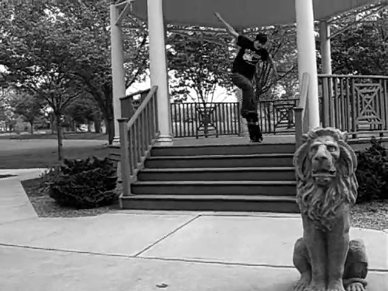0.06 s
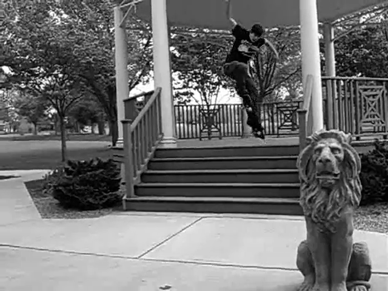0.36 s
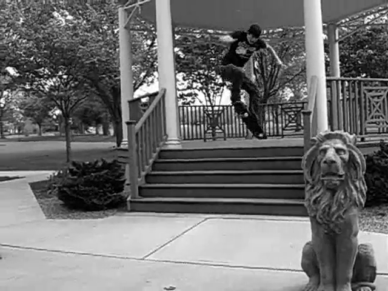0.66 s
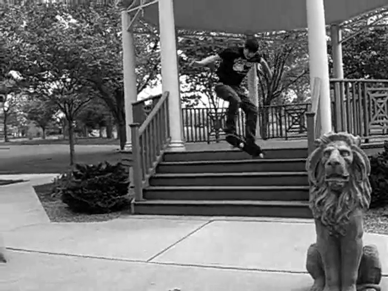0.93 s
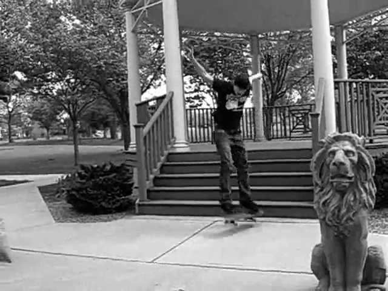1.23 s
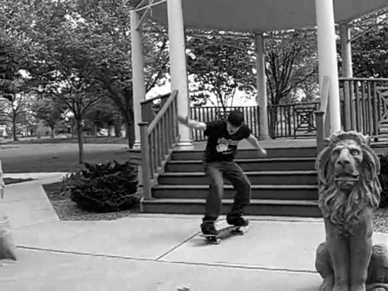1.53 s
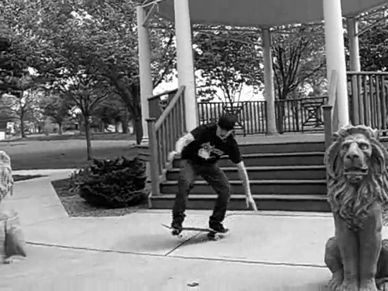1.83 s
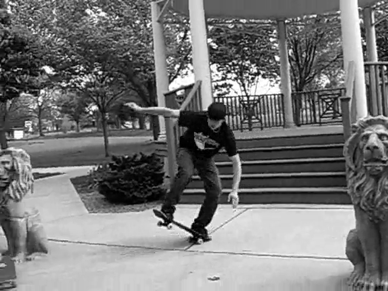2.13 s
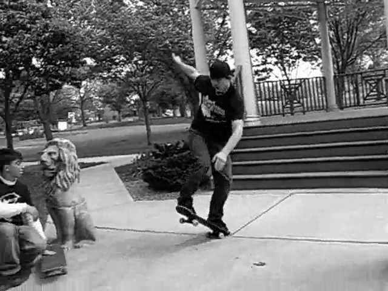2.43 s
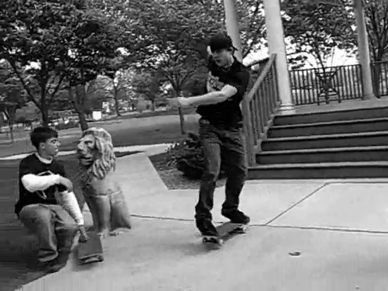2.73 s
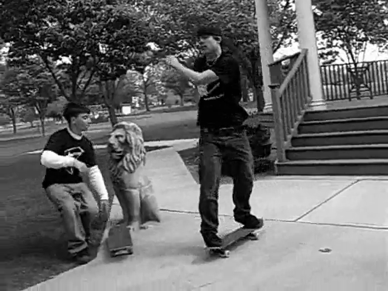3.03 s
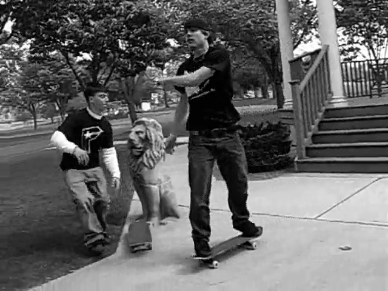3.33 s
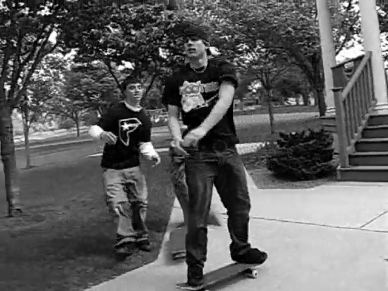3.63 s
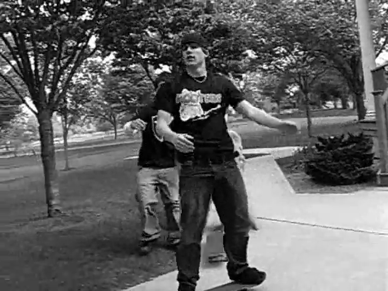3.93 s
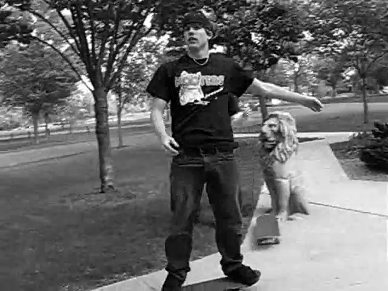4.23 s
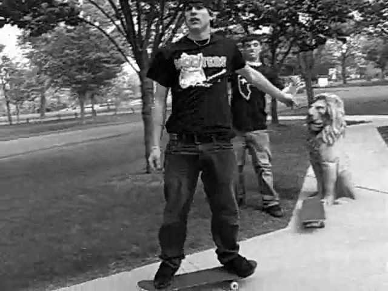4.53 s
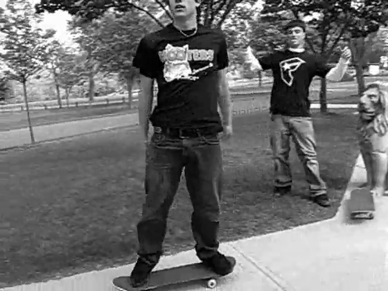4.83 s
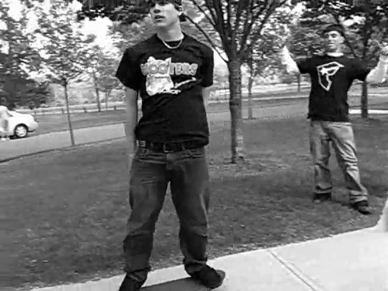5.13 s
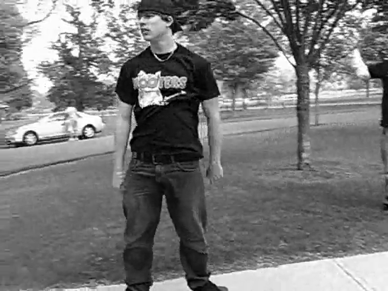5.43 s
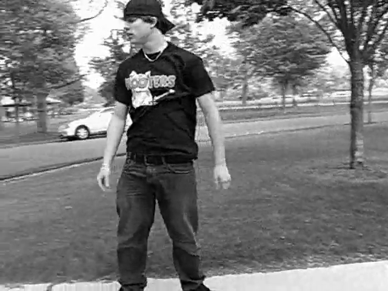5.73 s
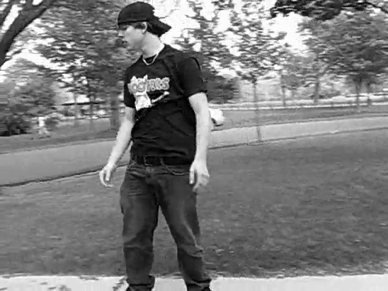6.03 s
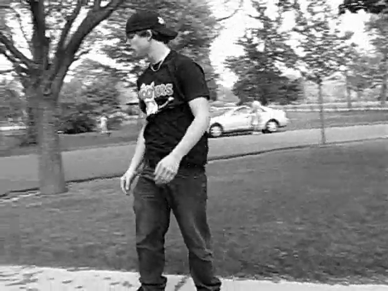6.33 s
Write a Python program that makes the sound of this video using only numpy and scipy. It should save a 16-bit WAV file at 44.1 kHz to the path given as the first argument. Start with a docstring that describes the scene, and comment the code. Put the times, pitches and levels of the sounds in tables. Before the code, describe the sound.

A low thump of wind hits the microphone, and at about 0.2 seconds a skateboard pops off a wooden platform some five metres away. A faint tap follows at 1 second. At 1.4 seconds the board lands on concrete with a loud, rattling crack and a short outdoor echo, then starts rolling. Around 2.2 seconds it clacks and the wheels skid briefly through a turn, with another clack near 2.9 seconds. The rough roll comes closer, knocking over pavement joints from 3.6 seconds, hardest at about 4.3. Between 4.5 and 5.2 seconds it passes about a metre away, crunching grit, with light metal clinks and ticking bearings. It then rolls more quietly, with a few small knocks around 6.3 seconds. Wind rumbles and buffets the microphone over a faint hiss throughout, strongest from about 2.3 to 4 seconds and easing after 5.

```python
"""A thump of wind on the microphone, then a skateboard cracks off a wooden bandstand five metres away.
Deck and trucks ring as it lands on concrete; the wheels skid through a pivot, then roll up to within a
metre, crushing grit and jolting over joints in the pavement. Steps, pillars and trees give a short echo.
Gusts buffet the microphone of a tape camcorder, whose notch filters cut at the harmonics of its motor
and whose gain control ducks after loud moments."""
import sys
import numpy as np
from scipy import signal
from scipy.fft import rfft, irfft
from scipy.io import wavfile

SR = 44100
rng = np.random.default_rng(int(sys.argv[2]) if len(sys.argv) > 2 else 0)


def generate_wav(sig):
    """Save sig (samples, or channels by samples) to the path in sys.argv[1] as 16-bit PCM at SR."""
    pcm = np.round(np.clip(np.atleast_2d(sig).T, -1, 1) * 32767).astype(np.int16)
    wavfile.write(sys.argv[1], SR, pcm)


N = 285537
TIME = np.arange(N) / SR

# The board's line. Each row: time in seconds, distance to the microphone in metres, roughness 0-1.
PATH = [(0, 5.4, .6), (1.4, 3.3, 0.7), (2.1, 6, .6), (3.1, 3.8, 0.7), (3.46, 3.3, 0.77), (3.7, 1.42, 0.86),
        (4.5, 0.83, 0.39), (5.1, 1.66, 0.47), (5.4, 1.1, 0.2), (6.0, 1.35, 0.48), (6.47, 2.1, 0.8)]
TOUCHDOWN_S = 1.45
# Pop, catch, landing, pivot, nose set down. Each row: start in seconds, deck level in dB, snap level
# in dB, rattle time constant in seconds, mode level in dB relative to the deck.
BLOWS = [(0.1625, -12, -24.5, 0.013, 1), (1.006, -24.5, -50, 0.0074, -5), (1.026, -23, -42, 0.023, -5.5),
         (1.25, -35, -44, 0.016, -14), (1.41, -1.5, -8, 0.015, -2), (1.422, -6.5, -13, 0.021, 4),
         (1.449, -12, -35, 0.013, -19), (1.477, -26, -12, 0.0045, -15), (1.488, -24.5, -35, 0.017, 16),
         (2.1756, -10, -13.5, 0.0066, 2.5), (2.238, -13.5, -32, 0.0064, 10.5), (2.8774, -9, -17, 0.015, -6),
         (2.8854, -18, -31, 0.018, 10.5)]
# Joints and pebbles under the wheels. Each row: start in seconds, deck level in dB, snap level in dB.
JOLTS = [(3.655, -13.5, -36), (3.729, -14.5, -24), (3.9245, -21, -25), (3.9616, -11.5, -22.5),
         (4.024, -15, -44), (4.097, -16, -33), (4.233, -13, -20.5), (4.316, -7.5, -17.5),
         (4.347, -1.5, -14), (5.156, -19, -20.5), (6.3107, -18.5, -31.5), (6.378, -18, -22),
         (6.4006, -15.5, -17.5)]
# Resonances. Each row: frequency in Hz, relative level in dB, seconds to fall 60 dB.
BOARD_MODES = [(356, -14.5, 0.03), (482, -9, 0.048), (719, -14, 0.11), (902, -4.5, 0.024),
               (1546, -19.5, 0.059), (1710, -29, 0.052), (1927, -6.5, 0.007), (2460, -7, 0.017),
               (2740, -21, 0.076), (2600, -8, 0.039), (3960, -27, 0.048), (5040, -49.5, 0.046),
               (5820, -60, .04)]  # deck and trucks together
PLANK_MODES = [(770, -9, 0.045), (908, 2, .033), (1540, -3, 0.013), (2950, -8, 0.0067)]  # bandstand floor
TRUCK_MODES = [(3110, -1, 0.013), (3420, -6, 0.0098)]  # metal alone
# Resonances of wheels and bearings. Each row: centre in Hz, width in Hz, relative level in dB.
WHEEL_MODES = [(574, 117, 9), (1250, 140, 7.5), (1972, 200, 8), (2820, 370, 2.5), (3497, 240, -3.5)]
# Coarse pavement. Each row: start in seconds, hold in seconds, roar level in dB, grit level in dB.
PATCHES = [(3.178, 0.092, -36, -42.5), (3.519, 0.14, -31, -42), (3.65, 0.13, -30, -36),
           (4.114, 0.028, -23, -37), (4.356, 0.06, -24, -27), (4.55, 0.024, -30, -31.5),
           (4.663, 0.059, -18.5, -20), (4.845, 0.058, -30, -31), (4.938, 0.042, -21.5, -25.5),
           (5.182, 0.028, -23.5, -32), (5.41, 0.028, -32, -42), (5.63, 0.2, -33, -39.5),
           (6.193, 0.021, -32, -40)]
# The trucks, close by. Each row: start in seconds, relative level in dB.
CLINKS = [(4.656, -7.5), (4.709, -8), (4.757, -12), (5.236, -15.5), (6.405, -11.5)]
# Swelling sounds. Each row: start in seconds, hold in seconds, relative level in dB.
SKIDS = [(2.173, .012, -25), (2.246, 0.061, -11.5), (2.422, 0.027, -19.5), (2.525, 0.011, -26.5)]  # wheels sliding sideways
SCUFFS = [(1.025, .02, -47), (1.735, 0.031, -43), (2.77, 0.005, -33), (3.17, 0.021, -39.5),
          (5.157, 0.0066, -40.5)]  # shoes on grip tape
GUSTS = [(.015, 0.047, -22.5), (.228, 0.063, -16.5), (1.376, .03, -17), (2.345, .2, -17), (2.75, 0.17, -17),
         (3.21, 0.2, -16), (3.5, .11, -19.5), (3.78, .11, -18.5), (4.37, 0.066, -22.5), (4.61, 0.087, -38)]  # on top of the breeze
# Wind pressure on the microphone. Each row: time in seconds, relative level in dB.
BREEZE = [(0, -24), (.3, -17), (.62, -26.5), (.8, -23.5), (1.3, -29.5), (1.88, -26.5), (2.22, -24.5),
          (2.33, -19), (2.65, -23), (3.3, -19.5), (4.05, -26.5), (4.65, -20.5), (4.8, -34), (5.05, -21),
          (5.15, -35), (6.1, -35.5), (6.47, -30.5)]
# Single eddies on the microphone port. Each row: peak time in seconds, relative level in dB,
# frequency in Hz that places the noise band, rise time in seconds.
BUFFETS = [(0.034, -4.5, 157, 0.0069), (0.299, -13, 168, 0.019), (0.388, -14.5, 390, 0.012),
           (0.434, -15, 160, 0.0057), (0.86, -11, 118, 0.011), (1.008, -10.5, 180, 0.028),
           (1.101, -16.5, 160, 0.016), (1.392, -10, 107, 0.036), (1.65, -12, 430, 0.01),
           (1.963, -15, 120, 0.016), (2.388, -15, 268, 0.0057), (2.443, -5, 227, 0.0077),
           (2.508, -10.5, 233, 0.0094), (2.634, -12.5, 261, 0.019), (2.71, -7, 287, 0.0097),
           (2.823, -9.5, 430, 0.013), (2.86, -7.5, 418, 0.0087), (2.955, -15, 195, 0.022),
           (2.997, -13.5, 302, 0.0063), (3.035, -7.5, 230, 0.013), (3.076, -10.5, 276, .02),
           (3.182, -10.5, 153, 0.025), (3.261, -7.5, 356, 0.0041), (3.31, -13.5, 190, 0.02),
           (3.385, -7.5, 153, 0.038), (3.445, -3, 314, 0.0036), (3.825, -8.5, 390, 0.0064),
           (3.876, -12.5, 254, 0.016), (4.224, -10, 94, 0.032), (4.517, -14, 226, 0.005),
           (4.628, -14.5, 162, 0.029), (4.691, -13.5, 190, 0.021), (5.03, -5, 325, 0.0093),
           (5.049, -10.5, 200, 0.015), (5.232, -17.5, 75, 0.021), (5.373, -16.5, 73, 0.0091)]
# Noise spectra. Each row: frequency in Hz, relative spectral density in dB.
KNOCK_BODY = [(100, -3.5), (300, 0), (600, -2), (950, -3.5), (1500, -1.5), (2000, -11.5), (3000, -31.5)]  # woody middle of a blow
KNOCK_SNAP = [(1200, -16), (2500, 4), (3500, 9.5), (4600, 3), (6000, 2), (7200, -4.5), (9000, -14),
              (12000, -17), (15500, -6.5)]  # its bright edge
SKID_COLOUR = [(300, -40), (450, -10), (950, -4), (1500, -2), (2600, -2.5), (3800, -9.5), (4800, -11.5),
               (6000, -13), (7200, -16.5), (8600, -29), (12000, -31.5), (15500, -24)]  # urethane on concrete
ROLL_ROAR = [(250, -7.5), (500, 6), (1000, 5.5), (1450, 7), (1700, 0.5), (1980, -1.5), (2300, -17.5),
             (3200, -21.5)]  # wheels on pavement
ROLL_GRIT = [(1600, 2), (2500, 4), (3000, 2), (3700, 3), (4300, -4.5), (5700, -1.5), (7000, -5.5),
             (9000, -17), (12000, -21.5), (15500, -10.5)]  # crushed grit
ROLL_RUMBLE = [(30, -33), (90, -4), (190, 5), (290, -2), (450, -11.5), (900, -38.5)]  # low end of the roll
WIND_COLOUR = [(15, -4), (30, -6.5), (55, -3), (100, -1.5), (180, -9), (300, -15.5), (600, -39),
               (1500, -57.5)]  # pressure on the port
FLUTTER_COLOUR = [(60, 8), (150, -8.5), (380, 0.5), (650, -9), (1000, -18), (1500, -29), (2500, -38)]  # gusts breaking up
AIR_COLOUR = [(100, -4.5), (500, 15), (1200, 1.5), (3000, -3), (6000, -8.5), (8500, -17.5), (12000, -20.5),
              (15500, -18)]  # open air


def knocks(contact_hz=11900, rise_s=0.00045, jolt_rattle_s=0.008, jolt_modes_db=-19.5):
    """Each blow or jolt cracks, rattles trucks and wheels, and sets the board's modes ringing."""
    hits = BLOWS + [(*jolt, jolt_rattle_s, jolt_modes_db) for jolt in JOLTS]
    body, snap, rattle = np.zeros(N), np.zeros(N), grains(10000, 3.4)
    softness = signal.butter(2, 1.3 * contact_hz, fs=SR)
    for s, deck_db, snap_db, rattle_s, _ in hits:
        span = slice(int(s * SR), int(s * SR) + SR // 5)
        age = np.maximum(TIME[span] - s, 0)
        envelope = np.exp(-age / rattle_s) * (1 - np.exp(-age / rise_s))
        body[span] += from_db(deck_db) * envelope
        snap[span] += from_db(snap_db) * signal.lfilter(*softness, envelope * rattle[span])
    out = colour(body * grains(12000, 3.3), KNOCK_BODY) + colour(snap, KNOCK_SNAP)
    starts, deck_db, _, _, modes_db = np.transpose(hits)
    for hz, mode_db, t60 in BOARD_MODES:
        strength = from_db(deck_db + modes_db + mode_db + rng.normal(0, 4, len(hits)))
        strength /= 1 + (hz / contact_hz) ** 2
        clicks = np.zeros(N)
        clicks[(starts * SR).astype(int)] = strength * rng.choice([-1, 1], len(hits))
        out += ring(clicks, hz, t60)
    return out


def rolling(roar_db=-35, grit_db=-36, whirr_db=-39, rumble_db=-26.5, grit_fade_db_per_s=1.03):
    """Wheels crush grit and hop over ridges; each hop swells roar and grit while the wheels whirr on."""
    _, roughness = in_time(PATH)
    hops = roughness * np.clip(3.3 * drift(63) + .5 * drift(210), -2.5, 1.7)
    roar = rms_one(colour(grains(9000, 3.3) * from_db(5.5 * hops), ROLL_ROAR))
    crunch = grains(16000, 6.5) * from_db(4.5 * hops + roughness * drift(150))
    grit = rms_one(colour(crunch, ROLL_GRIT))
    drive = rng.standard_normal(N) * from_db(3 * drift(42))
    whirr = sum(from_db(db) * rms_one(filtered(drive, 2, [hz - width / 2, hz + width / 2], "band"))
                for hz, width, db in WHEEL_MODES)
    rumble = colour(grains(2500, 3.2), ROLL_RUMBLE)
    edges = dict(attack_s=0.025, release_s=0.051)
    patch_roar = swells([(s, hold, db) for s, hold, db, _ in PATCHES], **edges)
    patch_grit = swells([(s, hold, db) for s, hold, _, db in PATCHES], **edges)
    near = nearness(loss_db=15.5)
    slowing_db = grit_fade_db_per_s * (TIME - TOUCHDOWN_S)  # a slower board crushes less grit
    roar_gain = np.hypot(from_db(roar_db) * near, patch_roar)
    grit_gain = np.hypot(from_db(grit_db - slowing_db) * nearness(loss_db=14), patch_grit)
    whirr_gain = np.hypot(from_db(whirr_db + 6 * (1 - roughness)) * near, from_db(-9) * patch_roar)
    return (roar_gain * roar + grit_gain * grit + whirr_gain * rms_one(whirr)
            + from_db(rumble_db) * near * rumble)


def skid(ring_db=-5.5, judder_db=3.5):
    """Urethane sticks and slips on the concrete; the slips also excite the board."""
    slips = grains(7000, 1.0) * from_db(judder_db * drift(110))
    board = sum(ring(slips, hz, t60) * from_db(db / 2) * (-1) ** k
                for k, (hz, db, t60) in enumerate(BOARD_MODES))
    scrape = rms_one(colour(slips, SKID_COLOUR)) + from_db(ring_db) * rms_one(board)
    return swells(SKIDS, attack_s=0.013, release_s=0.035) * rms_one(scrape)


def planks():
    """The wooden floor of the bandstand answers the pop of the tail."""
    pop_s = BLOWS[0][0]
    return sum(rattled(pop_s, hz, db, t60) for hz, db, t60 in PLANK_MODES)


def trucks():
    """The metal trucks clink as the rider's weight shifts, always on the same two modes."""
    return sum(rattled(s, hz, db + mode_db, t60) for s, db in CLINKS for hz, mode_db, t60 in TRUCK_MODES)


def bearings(ticks_per_s=70, t60=0.0073, level_db=-38):
    """Loose bearings tick against the trucks; they stand out close to the microphone."""
    ticks = sum(ring(grains(ticks_per_s, 1.6), hz, t60) * from_db(db) for hz, db, _ in TRUCK_MODES)
    return from_db(level_db) * nearness(loss_db=24) * rms_one(ticks)


def shoes(hz=5840, width_hz=1300, edge_s=0.0046):
    """Rubber soles drag over the grip tape: a short bright rasp."""
    rasp = signal.lfilter(*signal.iirpeak(hz, hz / width_hz, fs=SR), grains(6000, 7.1))
    return swells(SCUFFS, edge_s, edge_s) * rms_one(rasp)


def wind(lumps_db=3, flutter_lumps_db=6, eddy_low_hz=115):
    """Lumpy pressure on the microphone port; gusts add smaller eddies and break into a higher flutter."""
    flow = rms_one(colour(rng.standard_normal(N), WIND_COLOUR) * from_db(lumps_db * drift(11.4)))
    eddies = rms_one(filtered(colour(rng.standard_normal(N), WIND_COLOUR), 3, eddy_low_hz, "high"))
    turbulence = rng.standard_normal(N) * from_db(flutter_lumps_db * np.clip(drift(81), -2, 2))
    flutter = rms_one(colour(turbulence, FLUTTER_COLOUR))
    breeze = from_db(in_time(BREEZE)[0] + 3.5)
    gusts = swells(GUSTS, attack_s=0.035, release_s=0.026)
    flutter_gain = np.hypot(from_db(-16) * breeze, from_db(1.5) * gusts)
    return breeze * flow + from_db(-1.5) * gusts * eddies + flutter_gain * flutter


def buffets(skirt_db=-15, fall_ratio=1.14):
    """An eddy hits the port: a quick swell of low pressure noise that falls a little more slowly."""
    out, t = np.zeros(N + SR), np.arange(-SR // 8, SR // 8) / SR
    for s, db, hz, rise_s in BUFFETS:
        white = rng.standard_normal((2, len(t)))
        core = rms_one(filtered(white[0], 2, [0.36 * hz, 1.39 * hz], "band"))
        skirt = rms_one(filtered(white[1], 4, [hz, 2.74 * hz], "band"))
        eddy = filtered(core + from_db(skirt_db) * skirt, 3, 3.76 * hz, "low")
        swell = np.exp(-2 * (t / (rise_s * np.where(t < 0, 1, fall_ratio))) ** 2)
        eddy *= swell * np.linalg.norm(swell) / np.linalg.norm(eddy * swell)
        out[int(s * SR):][:len(t)] += from_db(db + 0.5) * eddy
    return out[len(t) // 2:][:N]  # centres each swell on its time


def park(x, early_db=-13.5, early_t60=0.36, late_db=-18, late_t60=0.63, dull_hz=4500):
    """Quick scatter from steps and pillars, then a faint dull tail from the roof and trees."""
    t = np.arange(SR) / SR
    early, late = (rng.standard_normal(SR) * from_db(-60 * t / t60) * (t > .006)
                   for t60 in (early_t60, late_t60))
    late = filtered(late, 1, dull_hz, "low")
    scatter = from_db(early_db) * early / np.linalg.norm(early)
    tail = from_db(late_db) * late / np.linalg.norm(late)
    return signal.fftconvolve(x, scatter + tail)[:N]


def air(level_db=-40.5):
    """The steady hiss of the open air."""
    return from_db(level_db) * colour(rng.standard_normal(N), AIR_COLOUR)


def gain_control(x, window_s=0.013, threshold_db=-19, slope=0.39, recovery_db_per_s=1.5, makeup_db=3):
    """Loud moments turn the camcorder's gain down; it creeps back up."""
    keep = np.exp(-1 / (window_s * SR))
    level_db = 10 * np.log10(signal.lfilter([1 - keep], [1, -keep], x ** 2) + 1e-12)
    excess_db = np.maximum(level_db - threshold_db, 0)
    recovery = recovery_db_per_s * TIME
    cut_db = np.maximum.accumulate(slope * excess_db + recovery, axis=-1) - recovery
    return x * from_db(makeup_db - cut_db)


def nearness(loss_db):
    """Gain of the roll: silent until touchdown, then 1 at a metre, less loss_db per tenfold distance."""
    distance_m, _ = in_time(PATH)
    return (TIME > TOUCHDOWN_S) * from_db(-loss_db * np.log10(distance_m))


def swells(events, attack_s, release_s):
    """Gain for a list of events: each rises up to its start, holds, then dies away."""
    power = np.zeros(N)
    for s, hold_s, db in events:
        rise = np.clip(1 + (TIME - s) / attack_s, 0, 1)
        fall = np.exp(-np.clip((TIME - s - hold_s) / release_s, 0, 20))
        power += (from_db(db) * rise * fall) ** 2
    return np.sqrt(power)


def rattled(s, hz, peak_db, t60, rattle_s=0.005):
    """A burst of quick contacts drives one mode, which rings out briefly."""
    out, t = np.zeros(N + SR // 4), np.arange(SR // 4) / SR
    tone = ring(rng.standard_normal(len(t)) * np.exp(-t / rattle_s), hz, t60)
    out[int(s * SR):][:len(t)] += from_db(peak_db) * tone / np.abs(tone).max()
    return out[:N]


def ring(clicks, hz, t60):
    """A unit click sets a sine of height 1 ringing."""
    decay, step = from_db(-60 / (t60 * SR)), 2 * np.pi * hz / SR
    return signal.lfilter([0, np.sin(step)], [1, -2 * decay * np.cos(step), decay ** 2], clicks + 1e-18)


def grains(per_s, spread_db):
    """Random tiny contacts of uneven size; rms 1."""
    sizes = from_db(spread_db * np.minimum(rng.exponential(1, N), 4)) * rng.choice([-1, 1], N)
    return rms_one(sizes * (rng.random(N) < per_s / SR))


def drift(rate):
    """Smooth random wander with spread 1, changing about rate times a second."""
    smoothing = signal.butter(2, rate, fs=SR / 20, output="sos")
    slow = signal.sosfilt(smoothing, rng.standard_normal(N // 20 + 2002))[2000:]
    return np.interp(np.arange(N) / 20, np.arange(len(slow)), rms_one(slow))


def colour(x, spectrum, size=8192):
    """Causal (minimum-phase) filter with this spectrum; white noise keeps its level."""
    hz, db = np.transpose(spectrum)
    grid = np.maximum(np.fft.rfftfreq(size, 1 / SR), 1)
    octaves_outside = np.maximum(np.log2(hz[0] / grid), 0) + np.maximum(np.log2(grid / hz[-1]), 0)
    curve_db = np.interp(np.log(grid), np.log(hz), db) - 10 * octaves_outside
    cepstrum = irfft(np.log(from_db(curve_db)))
    cepstrum[1:size // 2] *= 2
    cepstrum[size // 2 + 1:] = 0
    response = irfft(np.exp(rfft(cepstrum)))
    return signal.fftconvolve(x, response / np.linalg.norm(response))[:N]


def filtered(x, order, hz, kind):
    return signal.sosfilt(signal.butter(order, hz, kind, fs=SR, output="sos"), x)


def in_time(rows):
    """Each column of a timed curve, sample by sample."""
    times, *columns = np.transpose(rows)
    return [np.interp(TIME, times, column) for column in columns]


def from_db(db):
    return 10 ** (np.asarray(db) / 20)


def rms_one(x):
    return x / np.sqrt(np.mean(x ** 2) + 1e-20)


def scene(echo_reference_m=3.2, ring_echo_db=-6):
    """Board, park echo, wind and air at one microphone; the nearer the board, the drier it sounds."""
    board = knocks() + skid()
    ringing = planks() + trucks()
    distance_m, _ = in_time(PATH)
    echoes = park((board + from_db(ring_echo_db) * ringing) * distance_m / echo_reference_m)
    hiss = air()
    return (board + ringing + echoes + rolling() + bearings() + shoes() + wind() + buffets() + hiss)[None]


def record(dry, motor_hz=1087, notch_width_hz=130, cutoff_hz=15600):
    """The camcorder notches its motor harmonics, rides the gain, overloads on peaks and cuts the top."""
    notched = dry
    for hz in motor_hz * np.arange(2, 7):
        notched = signal.lfilter(*signal.iirnotch(hz, hz / notch_width_hz, fs=SR), notched)
    ducked = gain_control(notched)
    limited = ducked / (1 + ducked ** 4) ** .25
    return signal.sosfilt(signal.ellip(12, .3, 80, cutoff_hz, fs=SR, output="sos"), limited)


dry = scene()
out = record(dry)
generate_wav(out)
```